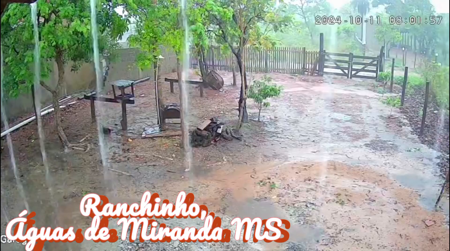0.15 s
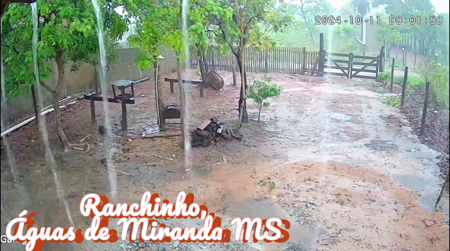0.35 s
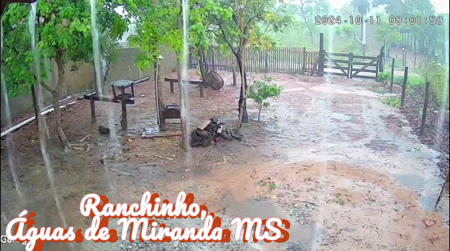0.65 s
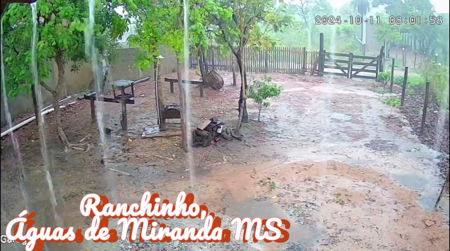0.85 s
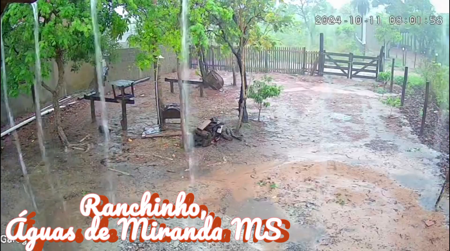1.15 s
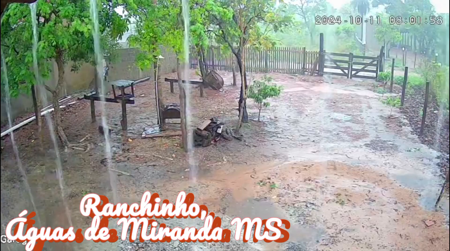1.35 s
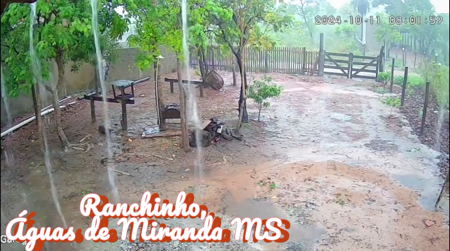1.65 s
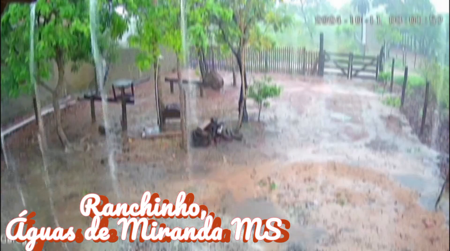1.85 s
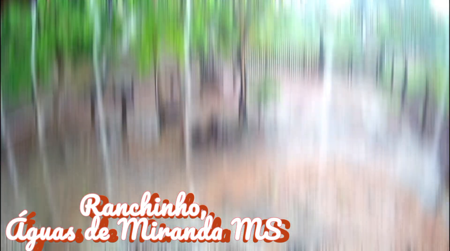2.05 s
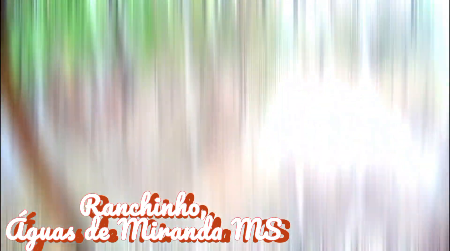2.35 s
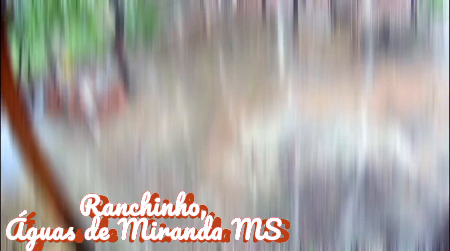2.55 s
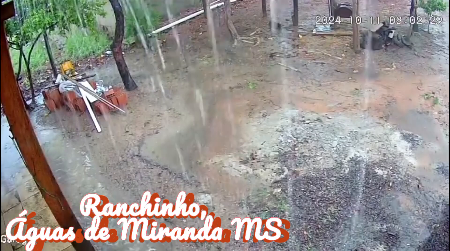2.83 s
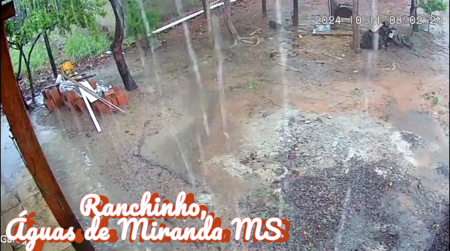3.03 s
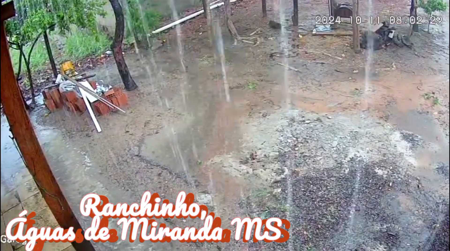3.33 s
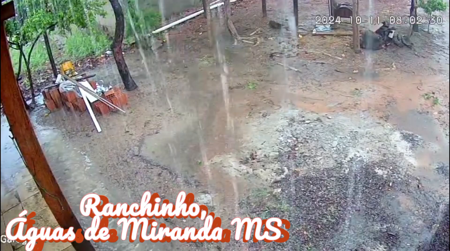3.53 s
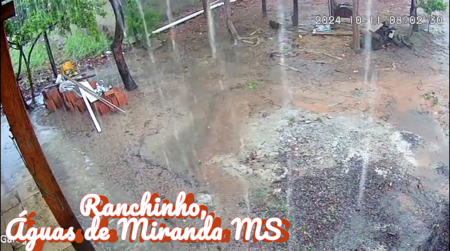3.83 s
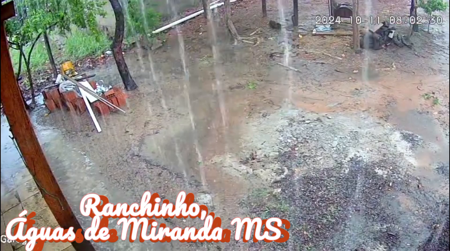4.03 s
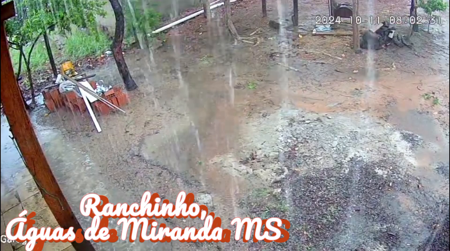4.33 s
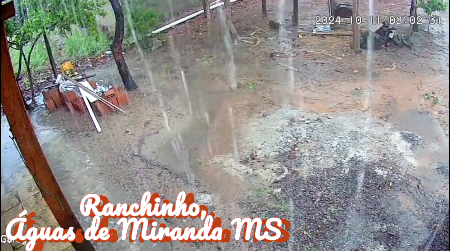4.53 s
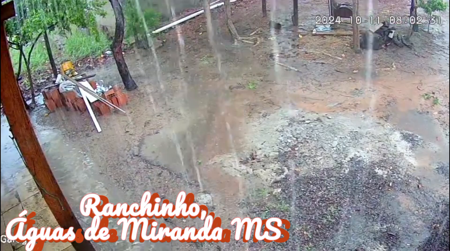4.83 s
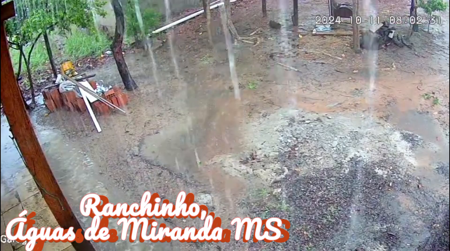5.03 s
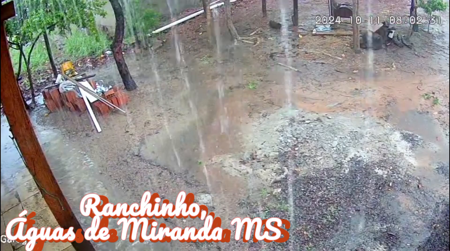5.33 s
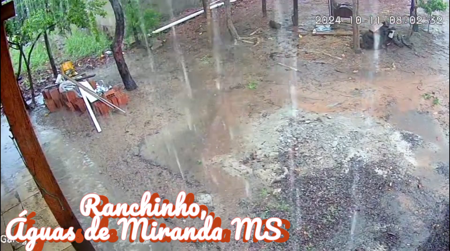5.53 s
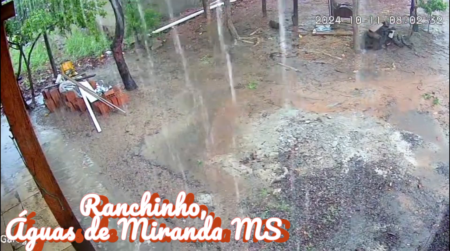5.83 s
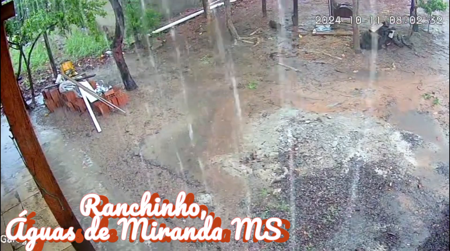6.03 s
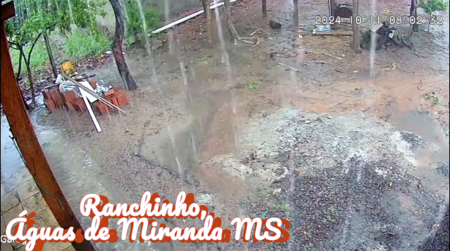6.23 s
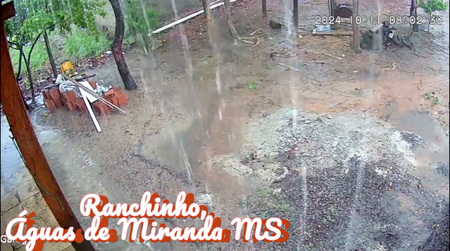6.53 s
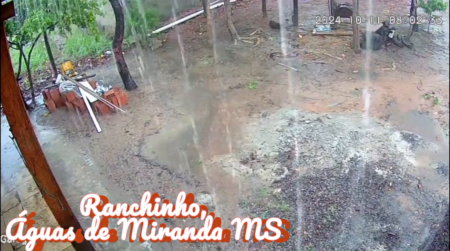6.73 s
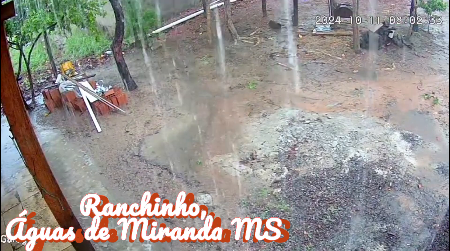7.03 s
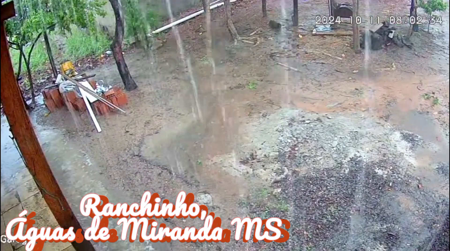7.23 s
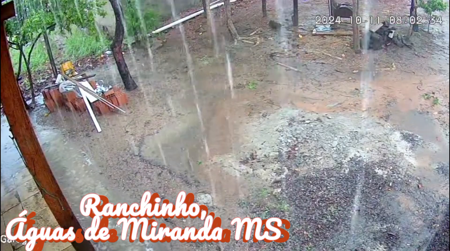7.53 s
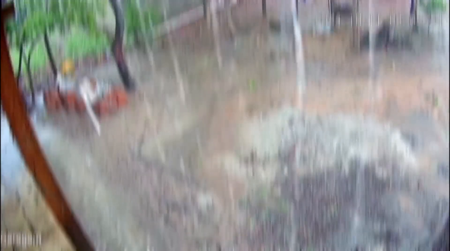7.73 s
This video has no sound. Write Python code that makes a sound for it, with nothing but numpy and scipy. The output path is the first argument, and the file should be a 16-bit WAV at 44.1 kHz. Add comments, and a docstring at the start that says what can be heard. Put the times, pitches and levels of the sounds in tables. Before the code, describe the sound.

Sparse rain patter with dripping run-off and faint metallic pings, a split-second gap, then a roaring heavy rain through a dull narrow-band camera microphone.

```python
"""Rain on a muddy yard, heard by a security camera under the eaves: an easing shower, then an abrupt cut to a downpour.
Far rain is shaped noise, near drops are short resonant ticks on mud and puddles, and run-off from the eaves
splats down as a sharp pulse with a spray of droplets. The roof drums low, with swells, short knocks and thuds;
short pings, as of drips striking metal, are decaying tones that glide slightly upward.
The camera samples at a telephone rate, so a faint mirror image of the sound lies above its band."""
import sys
import numpy as np
from scipy import signal
from scipy.fft import rfft, irfft, next_fast_len
from scipy.io import wavfile
from scipy.ndimage import map_coordinates

SR = 44100
rng = np.random.default_rng(int(sys.argv[2]) if len(sys.argv) > 2 else 0)


def bounce(signal):
    """Save signal as a 16-bit WAV file at the path given by the first command-line argument."""
    frames = np.transpose(np.atleast_2d(signal))
    limited = np.clip(frames, -1, 1)
    pcm = np.round(limited * 32767).astype(np.int16)
    wavfile.write(sys.argv[1], SR, pcm)


N = 347508
TIME = np.arange(N) / SR  # s
CUT_S = 2.439  # the shower gives way to the downpour


def amp(db):
    """Decibels to amplitude gain: 20 dB is a factor of ten."""
    return 10 ** (np.asarray(db) / 20)


def unit(x):
    """Normalisation to an rms of 1."""
    return x / np.sqrt(np.mean(x ** 2) + 1e-20)


def add(mix, s, sound):
    """Superposition: adds a sound into the mix at time s, in seconds."""
    part = mix[max(round(s * SR), 0):][:len(sound)]
    part += sound[:len(part)]


def colour(x, points):
    """Spectral shaping by (Hz, dB) points joined on a log-frequency axis."""
    hz, db = np.transpose(points)
    size = next_fast_len(len(x))
    bins = np.fft.rfftfreq(size, 1 / SR)
    gain = amp(np.interp(np.log(bins + 1), np.log(hz), db))
    return irfft(rfft(x, size) * gain, size)[:len(x)]


def unit_in_band(x, band):
    """Normalisation by band level: the part within band (Hz, Hz) gets an rms of 1."""
    sos = signal.butter(4, band, "bandpass", fs=SR, output="sos")
    return x / np.std(signal.sosfilt(sos, x))


def lowpass(x, edge_hz):
    """Band limiting by a very steep linear-phase low-pass."""
    taps = signal.firwin(2047, edge_hz, window=("kaiser", 8), fs=SR)
    return signal.oaconvolve(x, taps, "same")


def ring(x, hz, width_hz):
    """A damped resonance: the wider its peak, the faster it decays."""
    r = np.exp(-np.pi * width_hz / SR)  # pole radius
    # the zeros silence 0 Hz and half the sampling rate
    return signal.lfilter([1, 0, -1], [1, -2 * r * np.cos(2 * np.pi * hz / SR), r * r], x)


def pulse(t, hz, width_hz):
    """Impulse response of a resonance with energy 1: the wider the peak, the shorter the pulse."""
    wave = ring(1. * (t == 0), hz, width_hz)
    return wave / np.linalg.norm(wave)


def drift(per_s):
    """Slow random modulation of rms 1: random knots joined by straight lines."""
    knots = np.arange(0, N / SR + 1, 1 / per_s)
    return unit(np.interp(TIME, knots, rng.standard_normal(len(knots))))


def impacts(per_s, spread_db, largest):
    """Shot noise: random clicks, many from small or distant drops, a few from large and near ones."""
    size = amp(spread_db * np.minimum(rng.exponential(1, N), largest))
    sign = rng.choice([-1, 1], N)
    struck = rng.random(N) < per_s / SR
    return size * sign * struck


def scatter(sounds, per_s, spread_db, largest):
    """Independent random arrivals of sounds from a list: many small or distant, a few large and near."""
    out = np.zeros(N)
    for when, pick, size in rng.random((int(per_s * N / SR), 3)):
        size_db = spread_db * min(-np.log(1 - size), largest)
        add(out, when * N / SR, amp(size_db) * sounds[int(pick * len(sounds))])
    return out


def far_hiss(spectrum, flutter_db):
    """Incoherent superposition: countless far drops merge into a hiss of shaped noise."""
    hiss = colour(rng.standard_normal(N), spectrum)
    return unit_in_band(hiss * amp(flutter_db * drift(25)), (400, 1100))


def patchy(x, depth_db, width_hz, length_s):
    """Time-frequency modulation: flurries on one kind of ground or another make patches of pitch come and go."""
    hz, s, z = signal.stft(x, SR, nperseg=1024, noverlap=768)
    where = np.meshgrid(hz / width_hz, s / length_s, indexing="ij")
    field = map_coordinates(rng.standard_normal((256, 512)), where, order=1, mode="grid-wrap")
    patches = z * amp(depth_db * unit(field))
    flurries = signal.istft(patches, SR, nperseg=1024, noverlap=768)[1][:N]
    return unit(flurries) * np.std(x)  # overall level unchanged


def near_drops(spectrum, per_s, spread_db, spray_db, spray_s, width_hz, clump_db, crack_db, count=400):
    """Impact excitation: each drop's crack and decaying spray excite a resonance with its own pitch."""
    t = np.arange(SR // 20) / SR
    burst = np.exp(-t / .0011) + amp(spray_db) * np.exp(-t / spray_s)
    crack = amp(crack_db) * unit(t == 0)
    ticks = []
    for hz in np.linspace(1100, 3700, count):
        blow = crack + unit(burst * rng.standard_normal(len(t)))
        ticks.append(unit(ring(blow, hz, width_hz)))
    drops = colour(scatter(ticks, per_s, spread_db, largest=3.4), spectrum)
    clumps = amp(clump_db * drift(40))  # the level of the patter wanders
    return unit_in_band(drops * clumps, (1500, 3600))


def puddles(per_s, spread_db, damping, ring_s, count=400):
    """Damped narrow-band noise: fat drops plop into puddles further out, at every pitch."""
    # Spectrum of the plops. Each row: frequency in Hz, relative level in dB.
    plop_colour = [(330, -9), (480, -9), (720, -12), (1000, -4.5), (1400, -5.5), (2100, 1), (2500, -0.5),
                   (3200, 1), (3600, -4.5)]
    t = np.arange(SR // 12) / SR
    plops = []
    for hz in np.geomspace(330, 3500, count):
        width_hz = damping * hz
        fizz = ring(ring(rng.standard_normal(len(t)), hz, width_hz), hz, width_hz)
        plops.append(unit(fizz) * np.exp(-t / ring_s))
    plopping = scatter(plops, per_s, spread_db, largest=2.0)
    return unit_in_band(colour(plopping, plop_colour), (1500, 3600))


def splash(slap_db, spray_db, hz, width_hz, slap_s=0.00093, spray_s=.018, crack_share=0.66,
           droplets_per_s=1200, mist_db=-15):
    """Cavity resonance: a gob cracks on the mud, its droplets tick back, and the hollow it digs colours both."""
    t = np.arange(SR // 8) / SR
    droplets = rng.choice([-1, 1], len(t)) * (rng.random(len(t)) < droplets_per_s / SR)
    water = unit(droplets) + amp(mist_db) * rng.standard_normal(len(t))
    fizz = ring(ring(water, hz, 2 * width_hz), hz, 2 * width_hz)
    slap = np.exp(-t / slap_s)
    spray = (1 - slap) * np.exp(-t / spray_s)
    # most of the slap's energy arrives as one sharp pressure pulse
    share = np.clip(crack_share, 0, 1)
    crack = np.sqrt(share) * np.linalg.norm(slap) * pulse(t, hz, width_hz)
    hit = crack + np.sqrt(1 - share) * slap * unit(fizz)
    spatter = np.sqrt(np.mean(spray ** 2)) * unit(spray * fizz)
    return amp(slap_db) * hit + amp(spray_db) * spatter


def dribble(slap_db, spray_db, spread_db, low_hz, high_hz, width_hz, count):
    """Jittered periodic dripping: smaller gobs fall from the eaves, each with its own size and pitch."""
    gobs = np.zeros(N)
    for k, (when, size, pitch) in enumerate(rng.random((count, 3))):
        size_db = spread_db * (size - .5)
        hz = low_hz + pitch * (high_hz - low_hz)
        gob = splash(slap_db + size_db, spray_db + size_db, hz, width_hz)
        add(gobs, (k + when) * N / SR / count, gob)
    return gobs


def drumming(lump_db):
    """Forced vibration: dense soft blows on the roof merge into a low drumming."""
    # Spectrum of the roof. Each row: frequency in Hz, relative level in dB.
    roof_boom = [(21, -18), (44, -34.5), (63, -16.5), (86, -5), (116, 0.5), (166, 0.5), (216, -4),
                 (305, -10), (610, -16), (1510, -62.5)]
    blows = impacts(per_s=2400, spread_db=2.0, largest=3.0) * amp(lump_db * drift(9))
    return unit_in_band(colour(blows, roof_boom), (70, 260))


def surge():
    """Gaussian level envelopes, in dB: swells and short knocks of the roof's drumming."""
    # Swells and short knocks of the roof's drumming.
    # Each row: peak time in seconds, rise in dB, half length (to 1/e of the rise) in seconds.
    swells = [(0.678, 9, 0.088), (0.92, 5.5, 0.06), (0.987, 8, 0.036), (1.36, 7, 0.065), (2.0, 3.5, 0.033),
              (2.633, 5.5, 0.08), (2.855, 7, 0.085), (3.2, 4, 0.23), (4.35, 1, 0.15), (5.03, 3.5, 0.044),
              (5.982, 3.7, 0.63), (7.58, 3.5, 0.074)]
    return sum(rise_db * np.exp(-((TIME - s) / half_s) ** 2) for s, rise_db, half_s in swells)


def shower(plop_db=-3.5):
    """Sparse superposition: in moderate rain single drops and their spray stand apart."""
    # Spectra of far hiss and near drops. Each row: frequency in Hz, relative level in dB.
    hiss_colour = [(50, -16), (110, -9.5), (235, -2.5), (305, 2), (455, 1.5), (705, -4.5), (835, -0.5),
                   (1020, -2.5), (1310, 1.5), (2010, 4.5), (2460, 3.5), (3110, 8), (3590, 0.5)]
    drop_colour = [(310, -7), (910, -14), (1310, -14), (1660, -3), (2110, 3.5), (2400, -10.5), (3000, -1.5),
                   (3590, 6)]
    # The shower eases, picks up and settles. Each row: time in seconds, strength in dB.
    strength = [(0, 0.5), (0.1, 0), (0.38, 0), (0.47, -3), (0.575, -4.5), (0.63, -4), (0.78, -3), (0.83, 0),
                (0.99, -1.5), (1.13, -3), (1.21, -5), (1.37, -5.5), (1.55, -3.5), (1.85, -6), (2.05, -5.5),
                (2.43, -5)]
    # Far wash, near patter, roof. Each row: level at strength 0 in dB, change in dB per dB of strength.
    balance = [(-50, 1.1), (-40, 1.16), (-50, 0.8)]
    far = patchy(far_hiss(hiss_colour, flutter_db=1.5), depth_db=3.0, width_hz=100, length_s=.06)
    ticks = near_drops(drop_colour, per_s=600, spread_db=0.3, spray_db=-28.5, spray_s=0.013,
                       width_hz=610, clump_db=1.5, crack_db=2.5)
    plops = puddles(per_s=190, spread_db=2.5, damping=0.052, ring_s=0.01)
    gobs = dribble(slap_db=-2.0, spray_db=-3.0, spread_db=5.5, low_hz=1500, high_hz=3300,
                   width_hz=470, count=80)
    near = patchy(ticks + amp(plop_db) * plops, depth_db=3.0, width_hz=92, length_s=0.059)
    roof = drumming(lump_db=0.8) * amp(surge())
    strength_db = np.interp(TIME, *np.transpose(strength))
    layers = far, near + gobs, roof
    return sum(amp(db + follows * strength_db) * layer
               for (db, follows), layer in zip(balance, layers))


def ping(db, hz, attack_s=.002, ring_s=0.021, rise_per_s=.08):
    """Free decay of a gliding tone: a short ringing ping, as of a drip striking metal, gliding slightly upward."""
    t = np.arange(SR // 6) / SR
    turns = hz * (t + rise_per_s * t ** 2 / 2)  # cycles so far
    envelope = (1 - np.exp(-t / attack_s)) * np.exp(-t / ring_s)
    return amp(db) * envelope * np.sin(2 * np.pi * turns)


def close_drop(db, hz, width_hz=850, tick_s=0.0013, bounce_db=-7, bounce_s=.0016):
    """Impact and rebound: one hard tick, then a smaller one as the rebounding droplet lands."""
    t = np.arange(SR // 40) / SR
    wide, late, pitch = rng.uniform(0.79, 1.3, 3)
    tick = pulse(t, hz, width_hz * wide)
    add(tick, bounce_s * late, amp(bounce_db) * pulse(t, hz * pitch, width_hz))
    # the first tick has the energy of a sound of rms 1 lasting tick_s
    return amp(db) * np.sqrt(tick_s * SR) * tick


def thud(db, hz, swell_s=0.013):
    """Heavily damped panel vibration: the roof gives under a soft blow and swings a few times."""
    t = np.arange(SR // 8) / SR
    age = t / swell_s
    return amp(db) * (age * np.exp(1 - age)) ** 2 * np.sin(2 * np.pi * hz * t)


def downpour(plop_db=-6):
    """Dense superposition: in heavy rain short hard ticks crowd into a roar."""
    # Spectra of far hiss and near drops. Each row: frequency in Hz, relative level in dB.
    hiss_colour = [(50, -25), (110, -17.5), (235, -1.5), (385, 2), (525, -2.5), (695, -2.5), (845, 2),
                   (985, -0.8), (1410, -1), (2010, 0), (2810, 0.5), (3590, 2)]
    drop_colour = [(310, -18.5), (910, -5), (1460, -4), (1900, 1.4), (2180, 0), (2330, -2.5), (2820, 3.5),
                   (3150, 0.5), (3590, -0.1)]
    far_db, near_db, roof_db = -33.5, -27.5, -34  # far_db holds midway through the downpour
    far_growth_db_per_s = 0.33  # the far wash slowly thickens
    patter_follows = 0.22  # dB of near patter per dB of a surge
    far = patchy(far_hiss(hiss_colour, flutter_db=0.3), depth_db=1.06, width_hz=80, length_s=.06)
    ticks = near_drops(drop_colour, per_s=900, spread_db=1.45, spray_db=-22.5, spray_s=0.016,
                       width_hz=1700, clump_db=0.57, crack_db=3.5)
    plops = puddles(per_s=410, spread_db=1.5, damping=0.076, ring_s=0.01)
    gobs = dribble(slap_db=7.5, spray_db=-5, spread_db=3.5, low_hz=1610, high_hz=3360,
                   width_hz=700, count=60)
    near = patchy(ticks + amp(plop_db) * plops, depth_db=2.1, width_hz=90, length_s=.06)
    surge_db = surge()
    from_middle_s = TIME - (CUT_S + N / SR) / 2
    return (amp(far_db + far_growth_db_per_s * from_middle_s) * far
            + amp(near_db + patter_follows * surge_db) * (near + gobs)
            + amp(roof_db + surge_db) * drumming(lump_db=0.0))


def scene():
    """Superposition of sources: shower, then downpour, with splats, pings, close drops and roof thuds on top."""
    # The biggest gobs of run-off hitting the ground. Each row: start in seconds, slap level in dB,
    # spray level in dB, splash centre in Hz, width of the slap's resonance in Hz (the spray's two have twice that).
    runoff = [(0.006, -19, -28, 2870, 1200), (0.012, -31, -36, 1490, 220), (0.0378, -20, -26, 2770, 550),
              (0.077, -37, -30, 1720, 420), (0.115, -32, -40, 1350, 262), (0.183, -30, -40, 1220, 260),
              (0.228, -27, -34, 3230, 400), (0.265, -23, -30, 2930, 500), (0.269, -31, -43, 1200, 220),
              (0.327, -31, -28.5, 2550, 1100), (0.331, -33, -40, 1390, 350), (0.375, -36, -49, 1300, 260),
              (0.402, -25, -32.5, 3220, 700), (0.416, -39, -37.5, 1080, 320), (0.443, -43, -42, 875, 260),
              (0.544, -31, -37, 3300, 600), (0.587, -31, -32.5, 3050, 700), (0.708, -34, -35, 3300, 600),
              (0.7988, -24.5, -27, 2900, 1300), (0.801, -29, -33.5, 1450, 300), (0.84, -38, -37, 1500, 320),
              (0.872, -33, -32.5, 2100, 600), (0.971, -30, -31, 2350, 600), (0.9838, -19, -31, 2230, 420),
              (1.041, -38, -47, 1300, 220), (1.065, -24, -34, 3000, 380), (1.112, -28, -30.5, 3220, 600),
              (1.189, -30, -42, 2800, 400), (1.2172, -24, -34.5, 1990, 350), (1.225, -35, -36, 1480, 250),
              (1.323, -35, -42, 3050, 400), (1.447, -33, -34, 1950, 550), (1.471, -27, -32, 3200, 900),
              (1.602, -37, -33, 3100, 1200), (1.6995, -31, -37, 3000, 600), (1.807, -35, -41, 1870, 500),
              (1.9558, -25, -32.5, 3070, 650), (2.038, -36, -37, 3170, 600),
              (2.1425, -33, -32.5, 2050, 700), (2.149, -22, -34, 3040, 450), (2.261, -38, -44, 2190, 500),
              (2.308, -33, -41, 3420, 500), (2.388, -29, -42, 2210, 400), (2.513, -18, -21, 2200, 900),
              (2.704, -16, -20, 2460, 600), (3.148, -14, -24, 3090, 796), (3.293, -22, -20.5, 1900, 700),
              (3.4332, -12, -31, 2900, 550), (3.5403, -18, -25, 2400, 1200), (4.052, -12, -19, 2420, 520),
              (4.434, -9, -22, 2500, 1300), (4.983, -14, -19, 2040, 550), (5.447, -9.5, -15, 2610, 1300),
              (5.612, -5.5, -25, 2780, 850), (5.7483, -7, -21, 2430, 800), (5.925, -10, -20.5, 2130, 900),
              (6.118, -3.8, -27, 2550, 1400), (6.1305, -8, -24, 2750, 1000), (6.324, -15, -16.5, 2200, 900),
              (6.514, -11, -12.5, 2930, 1400), (7.091, -9.5, -17, 2260, 700),
              (7.835, -16, -16.5, 2000, 900)]
    # Short ringing pings, as of drips striking metal. Each row: start in seconds, level in dB, starting pitch in Hz.
    ringing_drips = [(0.04, -33, 2800), (0.08, -32, 1770), (0.975, -25, 2120), (0.982, -26, 2295),
                     (1.15, -37.5, 1900), (1.448, -37, 1870), (2.388, -35, 2210)]
    # The clearest drops, just below the camera. Each row: start in seconds, level in dB, pitch in Hz.
    clear_drops = [(0.2445, -29.0, 3190), (0.3542, -28, 3090), (0.604, -29, 3220), (0.8148, -31, 2790),
                   (0.9603, -29, 2100), (1.3396, -39.0, 2850), (1.4828, -32, 3170), (1.618, -35, 2920),
                   (1.7105, -36, 2810), (1.7287, -32, 3020), (1.8086, -41, 1990), (1.8192, -35, 2350),
                   (1.9251, -33, 3180), (1.963, -32, 2790), (1.9902, -29, 3370), (2.2091, -32, 1900),
                   (2.4938, -17, 3220), (2.5225, -16, 2420), (2.54, -15, 2660), (2.7156, -14, 2790),
                   (2.7581, -15.5, 2840), (2.7916, -17, 2680), (3.085, -16, 2780), (3.103, -17, 2740),
                   (3.2014, -16.5, 2550), (3.2552, -13.5, 1980), (3.336, -17.5, 2700), (3.4021, -22, 2540),
                   (3.4826, -16, 3140), (3.4965, -18.5, 3350), (3.5897, -17.5, 1950), (3.664, -15, 2490),
                   (3.8444, -16.5, 2680), (4.1328, -14, 1900), (4.667, -19, 1940), (4.744, -14, 2600),
                   (4.8416, -19.5, 1860), (5.036, -16, 2700), (5.4295, -24, 3050), (5.6646, -14, 2930),
                   (5.7293, -12.5, 3490), (5.9073, -21, 2850), (6.1749, -21.5, 2900), (6.184, -14.5, 2830),
                   (6.2055, -15, 2500), (6.3614, -16, 2460), (6.3832, -17, 2820), (6.6262, -27, 3010),
                   (6.6367, -14, 2870), (6.7002, -17.5, 2070), (7.1032, -13, 2960), (7.2766, -19, 2750),
                   (7.29, -15, 2940), (7.6907, -15.5, 2730)]
    # Heavy gobs on the roof. Each row: start in seconds, level in dB, pitch in Hz.
    roof_gobs = [(0.586, -43, 149), (0.638, -38, 149), (0.976, -33, 125), (1.377, -50, 143)]
    yard = np.where(TIME < CUT_S, shower(), downpour())
    events = (runoff, splash), (ringing_drips, ping), (clear_drops, close_drop), (roof_gobs, thud)
    for table, sound in events:
        for s, *row in table:
            add(yard, s, sound(*row))
    # the sound drops out for an instant at the cut
    gate = np.clip(abs(TIME - CUT_S + .002) / .002 - 1, 0, 1)
    return (yard * gate)[None]


def record(dry):
    """Spectral imaging: the camera keeps a narrow band; playback mirrors it about half the sampling rate."""
    # Strength of the mirror image. Each row: frequency in Hz, gain in dB.
    mirror = [(4400, -6), (4700, -10.8), (5000, -17.4), (5300, -24), (5600, -33.5), (5900, -47)]
    camera_rate_hz, camera_edge_hz, top_hz = 8000, 3612, 6000
    band = lowpass(dry[0], camera_edge_hz)
    image = colour(2 * band * np.cos(2 * np.pi * camera_rate_hz * TIME), mirror)
    return lowpass(band + image, top_hz)[None]


dry = scene()
out = record(dry)
bounce(out)
```